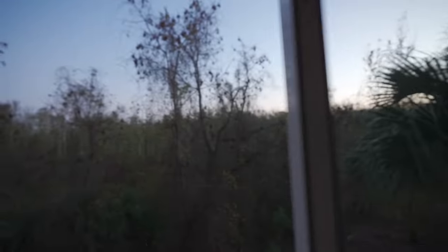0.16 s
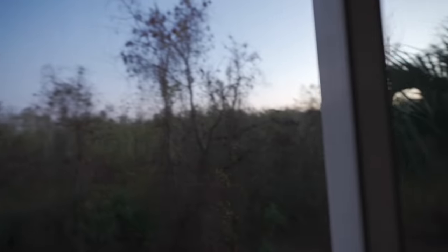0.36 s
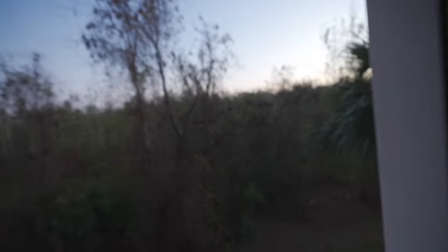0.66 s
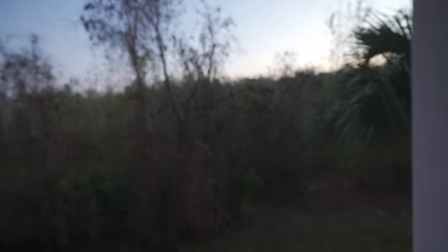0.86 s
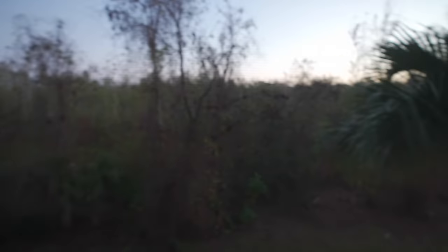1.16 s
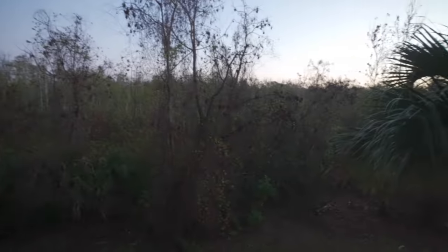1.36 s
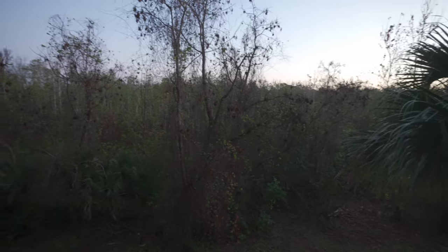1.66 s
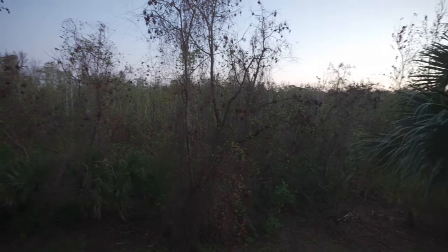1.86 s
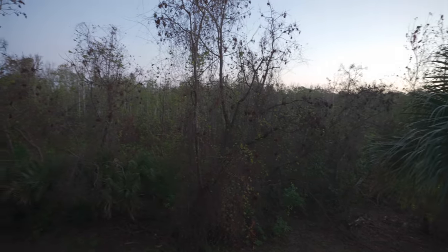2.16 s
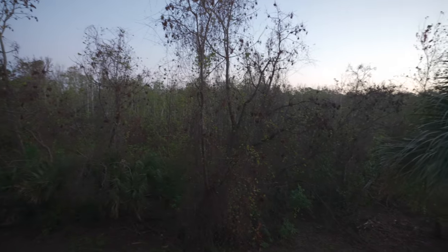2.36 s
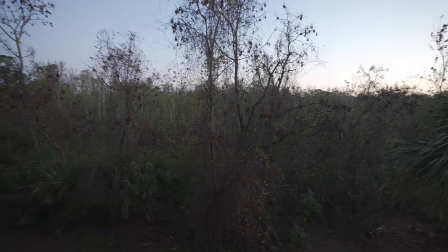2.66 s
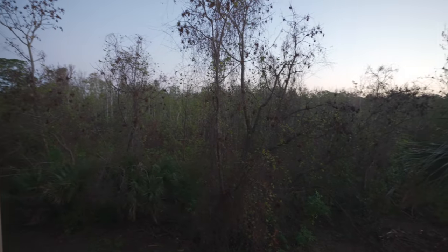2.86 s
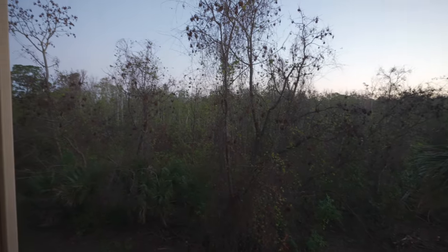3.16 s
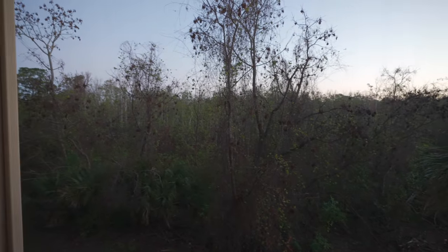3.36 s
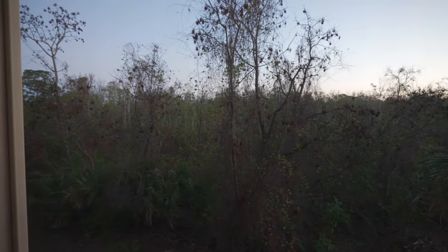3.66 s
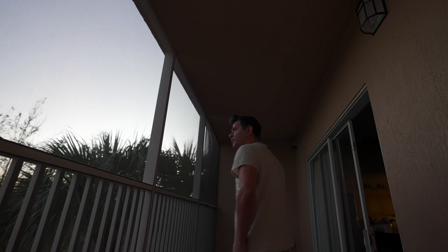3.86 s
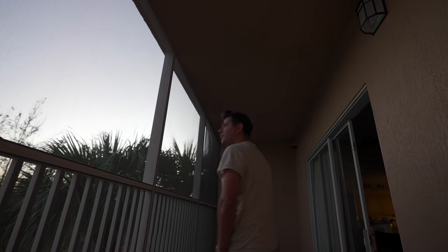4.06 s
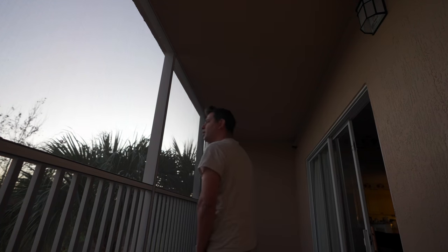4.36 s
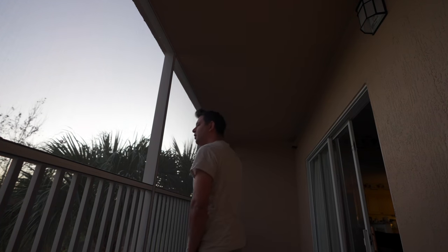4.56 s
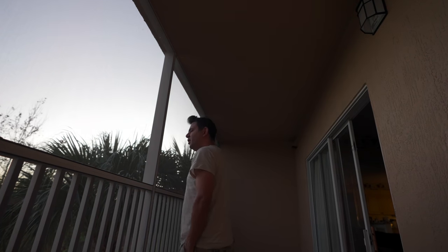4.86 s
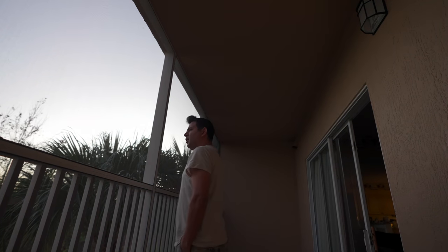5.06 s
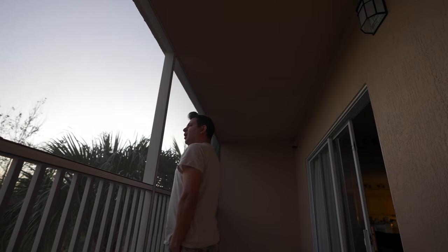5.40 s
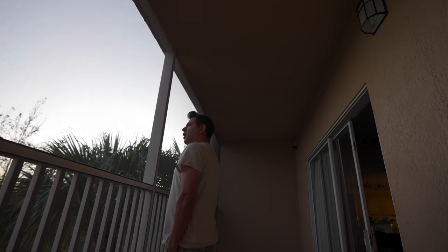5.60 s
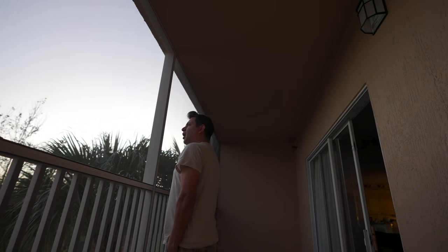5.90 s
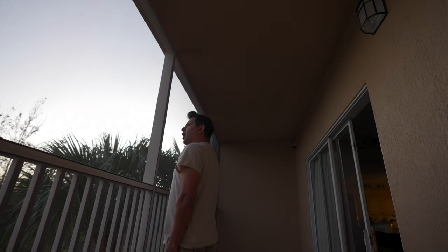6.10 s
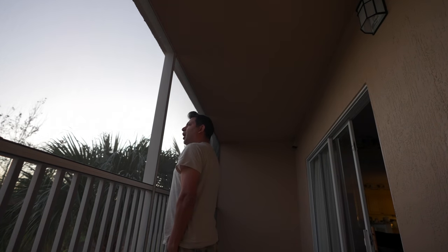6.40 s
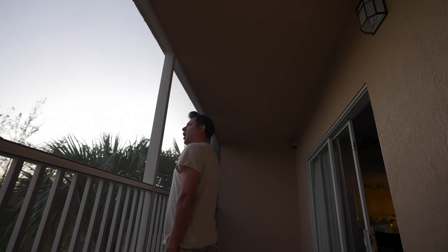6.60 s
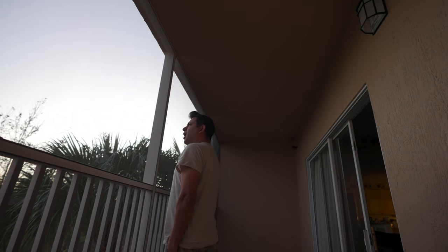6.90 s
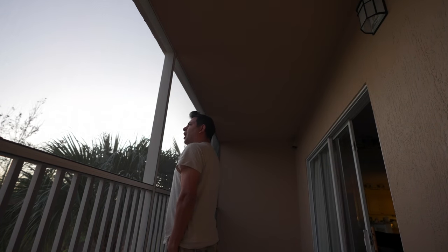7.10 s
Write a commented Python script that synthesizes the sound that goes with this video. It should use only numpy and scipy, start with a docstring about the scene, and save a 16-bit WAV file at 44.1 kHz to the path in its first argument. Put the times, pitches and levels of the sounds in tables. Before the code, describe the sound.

Several songbirds trill, pipe and whistle in scrubby woodland over a low traffic rumble, with microphone thumps and soft shoe scuffs on a balcony.

```python
"""A bird's trill is already under way over rumbling traffic and buffeting air: dawn on a balcony above scrubby woodland.
Songbirds whistle by gliding near-sine tones; filtered decaying noise and a trunk echo spread each song among the trees.
Resonated grains make shoe scuffs; shaped noise makes the traffic and the air on the hand-held microphone;
decaying sines make bumps; smooth noise and steady sines make the electronics hiss and whine."""
import sys
import numpy as np
from scipy import signal
from scipy.fft import rfft, irfft
from scipy.io import wavfile
from scipy.ndimage import uniform_filter1d

SR = 44100
rng = np.random.default_rng(int(sys.argv[2]) if len(sys.argv) > 2 else 0)


def persist_wave(psi):
    """Save psi, clipped to +-1, as 16-bit WAV."""
    counts = np.round(np.clip(psi, -1, 1) * 32767).astype(np.int16)
    wavfile.write(sys.argv[1], SR, np.atleast_2d(counts).T)


N = 319284
T = np.arange(N) / SR
LEAD = SR // 2  # samples of song before the start, whose echo is still ringing
SONG_T = np.arange(-LEAD, N) / SR


def undb(db):
    """Decibel law: amplitude gain of a level."""
    return 10 ** (np.asarray(db) / 20)


def level(x, db):
    """Energy normalisation: scale to an rms level."""
    return x * undb(db) / np.sqrt(np.mean(x ** 2))


def band(x, lo_hz, hi_hz):
    """Band limitation by a steep Butterworth band-pass."""
    return signal.sosfilt(signal.butter(4, [lo_hz, hi_hz], "band", fs=SR, output="sos"), x)


def coloured(points):
    """Spectral shaping: white noise weighted by (f/Hz, level/dB) points joined on a log frequency axis."""
    hz, db = np.transpose(points)
    f = np.maximum(np.arange(N // 2 + 1) * SR / N, 1)
    gain = undb(np.interp(np.log(f), np.log(hz), db, -120, -120))
    return irfft(rfft(rng.standard_normal(N)) * gain, N)


def resonate(x, peaks):
    """Modal superposition: a parallel sum of resonances (f/Hz, width/Hz, level/dB)."""
    out = 0
    for hz, width, db in peaks:
        out = out + undb(db) * signal.lfilter(*signal.iirpeak(hz, hz / width, SR), x)
    return out


def walk(rate, size=N):
    """Random modulation: Gaussian values held 1 / rate s, then smoothed twice."""
    k = int(SR / rate)
    steps = np.repeat(rng.standard_normal(size // k + 1), k)
    return uniform_filter1d(uniform_filter1d(steps, k), k)[:size]


def note(rows, start=0., db=0., multiple=0.99, edge_s=0.0029):
    """Frequency modulation: a near-sine syllable follows rounded glides, with soft ends."""
    # by default a note sounds at 0.99 of its listed pitch
    s, hz, shape_db = np.transpose(rows)
    s, out = np.sort(s) + start, np.zeros(len(SONG_T))
    here = slice(*np.searchsorted(SONG_T, [s[0] - .01, s[-1] + .01]))
    t = SONG_T[here]
    pitch = uniform_filter1d(np.interp(t, s, hz), size=200)
    phase = 2 * np.pi * multiple * np.cumsum(pitch) / SR
    edges = np.clip(np.minimum(t - s[0], s[-1] - t) / edge_s + .5, 0, 1) ** 2
    out[here] = np.sqrt(2) * undb(db + np.interp(t, s, shape_db)) * edges * np.sin(phase)
    return out


def song(phrase, events, wander, scatter_db, high_db=0, opening_db=0):
    """Repetition with variation: each note of the phrase differs a little in pitch and strength."""
    tune, sway = rng.standard_normal((len(events), len(phrase), 2)).T
    sway = scatter_db * sway
    sway[1] += high_db  # the second note of every phrase
    sway[0, 0] += opening_db  # the very first note
    out = 0
    for i, (s, db) in enumerate(events):
        for j, rows in enumerate(phrase):
            out = out + note(rows, s, db + sway[j, i], 1 + wander * tune[j, i])
    return out


# a trilled phrase, a list of notes; columns: t/s from phrase start, f/Hz, relative level/dB
TRILL_NOTES = [
    [(0, 2250, 4), (.009, 2680, -4.5), (.018, 2690, 1), (.03, 2516, -12)],
    [(.068, 3250, -4.5), (.086, 2876, -1), (.098, 3150, -7), (.125, 2880, -5)],
    [(.107, 2533, -6.5), (.118, 2314, -4), (.133, 2155, -8.5), (.15, 2090, -9)],
]
# bouts of trills; columns: start t/s, number of phrases, first spacing/s, slowing/s per phrase,
# level/dB added to the second note, phrase level/dB at start, middle and end
TRILL_BOUTS = [(-.152, 8, .2085, .0016, -1, -40, -40, -41.5), (4.182, 9, .2125, .0008, 4, -42.5, -39, -40)]


def trills():
    """Rhythmic deceleration: the interval between phrases grows linearly within each bout."""
    out = 0
    for start, count, spacing, slowing, high_db, *levels in TRILL_BOUTS:
        k = np.arange(count)
        times = start + spacing * k + slowing * k * (k - 1) / 2
        events = list(zip(times, np.interp(k / k[-1], [0, .5, 1], levels)))
        # a bout swallows its very first note
        out = out + song(TRILL_NOTES, events, 0.0054, scatter_db=2.0, high_db=high_db, opening_db=-22)
    return out


# a falling and rising phrase, a list of notes; columns: t/s from phrase start, f/Hz, relative level/dB
CHEER_NOTES = [
    [(.014, 4673, -11), (.028, 4560, -12.5), (.043, 4250, -5.5), (.058, 3375, -3.5), (.068, 2960, -6)],
    [(.074, 2650, -3), (.09, 2540, -1.5), (.12, 2413, -22), (.165, 2300, -15), (.2, 2914, 0.5)],
    [(.215, 2933, -8), (.232, 3020, 0), (.252, 3515, -1.5)],
]
# its repetitions; columns: t/s, level/dB
CHEER_EVENTS = [(2.88, -48.5), (3.266, -46.5), (3.647, -44), (4.028, -41.5), (4.416, -43.5), (4.8, -41.5)]


def cheers():
    """Wide frequency sweeps: a whistle falls, then rises."""
    return song(CHEER_NOTES, CHEER_EVENTS, 0.0039, scatter_db=3)


# a downward slurred phrase, a list of notes; columns: t/s from phrase start, f/Hz, relative level/dB
SLUR_NOTES = [
    [(0, 4200, -9), (.03, 3900, -9), (.07, 3550, -5)],
    [(.075, 3680, -7), (.12, 3300, -7)],
    [(.13, 3020, 0), (.17, 2700, -3), (.21, 2480, -9)],
]
# its repetitions; columns: t/s, level/dB
SLUR_EVENTS = [(1.02, -58), (1.669, -55), (2.345, -55)]


def slurs():
    """Portamento: each whistle steps down in falling glides; the last starts strongest, then fades."""
    return song(SLUR_NOTES, SLUR_EVENTS, 0.0101, scatter_db=0)


# arched note before the link; columns: t/s from link start, ratio to held f, relative level/dB
ARCH = [(-.088, .86, -15), (-.043, 0.95, -3.5), (0, .9, -8)]
# held note that droops; columns: share of its length, ratio to held f, relative level/dB
HELD = [(0, 0.99, -6), (.55, 1.005, -3.5), (1, .95, -8)]
# faint falling end; columns: t/s from the end of the held note, ratio to held f, relative level/dB
DROP = [(0, 0.84, -11), (.03, .86, -21)]
# piped phrases; columns: held note t/s, length/s, held f/Hz, level/dB,
# link length/s, nominal link start f/Hz (sounds at 0.99 f), level/dB of arch and link
PIPES = [(0.611, 0.069, 3380, -47, 0.042, 2670, -64), (1.255, 0.083, 3355, -45.5, .04, 2700, -64),
         (1.965, 0.08, 3345, -49, .03, 3070, -57), (2.664, 0.082, 3280, -38, 0.034, 2680, -45),
         (3.362, 0.089, 3358, -34.5, 0.027, 3040, -41.5), (4.071, .085, 3366, -40.5, .047, 2710, -43),
         (6.147, 0.093, 3360, -41, 0.041, 2650, -45), (6.834, 0.098, 3430, -39, 0.038, 2720, -47)]


def piping():
    """Pitch proportionality: arch, held note and drop scale with one held pitch; a short link rises between."""
    out = 0
    for s, length, hz, db, link_s, link_hz, lead_db in PIPES:
        link = [(-link_s, link_hz, 0), (0, link_hz + 305, 0)]
        out = out + note(ARCH, s - link_s, lead_db, hz) + note(link, s, lead_db)
        out = out + note(np.multiply(HELD, (length, 1, 1)), s, db, hz) + note(DROP, s + length, db, hz)
    return out


# faint notes sung only once; columns: t/s, length/s, nominal start and end f/Hz (sound at 0.99 f), level/dB
LONE_NOTES = [(0.033, 0.1, 4500, 4400, -63.5), (4.83, 0.12, 1380, 1400, -52),
              (5.79, .035, 3660, 3550, -55.5)]


def lone_notes():
    """Linear glides: single faint whistles."""
    out = 0
    for s, length, hz, to_hz, db in LONE_NOTES:
        out = out + note([(0, hz, 0), (length, to_hz, 0)], s, db)
    return out


# upward swoop opening each syllable; columns: t/s, nominal f/Hz (sounds at 0.99 f), relative level/dB
SWOOP = [(0, 1266, -11), (.017, 1670, -0.5)]
# its two endings, a flip to a high falling note or a sag back; columns as for the swoop
FLIP = [(.017, 2097, -0.5), (0.027, 2047, -1.5), (.032, 1750, -1)]
SAG = [(.017, 1655, 0.5), (.031, 1404, -4)]
# gurgled syllables; columns: t/s, level/dB, ending
GURGLES = [(2.317, -34, SAG), (2.361, -32.5, FLIP), (2.413, -34.5, FLIP), (2.462, -34, FLIP),
           (2.51, -33, SAG), (2.556, -38.5, SAG)]
# nasal first note; columns: t/s, fundamental f/Hz, level/dB
NASAL = [(2.256, 787, -47), (2.266, 1154, -50), (2.288, 1168, -43.5), (2.304, 1044, -44.5),
         (2.318, 1200, -50)]
# its harmonic series; columns: multiple of the fundamental, relative level/dB
NASAL_PARTIALS = [(1, 1.5), (2, 0), (3, -5.5)]


def gurgle():
    """Harmonic superposition colours a deeper voice's nasal note; swooping syllables flip or sag."""
    out = 0
    for s, db, ending in GURGLES:
        out = out + note(SWOOP, s, db) + note(ending, s, db)
    for multiple, db in NASAL_PARTIALS:
        out = out + note(NASAL, db=db, multiple=multiple)
    return out


# reverberation per bird; columns: decay t60/s, diffuse tail level/dB, trunk echo t/s, trunk echo level/dB,
# depth/dB per unit of random flutter in the direct sound
WOODS = {"trill": (.95, 3, .048, -7, 3), "cheer": (.9, -1, .044, -11, 3.5), "slur": (.8, 4, .04, -12, 8),
         "pipe": (1.5, -11, .2, -24, 1.5), "gurgle": (.85, -4.5, .017, -7, 3)}


def woods(x, bird):
    """Reverberation: direct sound, one trunk echo and a diffuse leaf-scattered tail; stirring air flutters them."""
    t60, tail_db, echo_s, echo_db, flutter_db = WOODS[bird]
    t = T[:SR]
    tail = rng.standard_normal(SR) * np.exp(-np.log(1000) * t / t60)
    tail *= np.clip(t / 0.017, 0, 1)  # the diffuse echo builds up over 17 ms
    tail *= undb(tail_db) / np.sqrt(np.sum(tail ** 2))
    tail[int(echo_s * SR)] += undb(echo_db)
    # moving leaves blur the pitch of what they scatter
    fluttering = x * undb(5.6 * walk(260, size=len(x)))
    scattered = signal.fftconvolve(fluttering, tail)[:len(x)]
    direct = x * undb(flutter_db * walk(130, size=len(x)))
    return (direct + scattered)[LEAD:]


def birds():
    """Independent propagation paths: five singers, each with its own balance of direct sound and echo."""
    return (woods(trills(), "trill") + woods(cheers(), "cheer") + woods(slurs(), "slur")
            + woods(piping() + lone_notes(), "pipe") + woods(gurgle(), "gurgle"))


# resonances of sole, grit and dust, applied twice in series; columns: f/Hz, width/Hz, level/dB per pass
SOLE = [(3850, 920, -0.4), (1900, 1530, -0.6)]
GRIT = [(5600, 1800, 5.1), (7830, 390, 4.3)]
DUST = [(10100, 500, -14), (11300, 720, 2), (12800, 2200, 4), (14900, 1900, 5.5)]
# shoe scuffs; columns: t/s, fall/s, sole level/dB, grit level/dB, dust level/dB
SCUFFS = [(.25, 0.17, -50.5, -68, -74), (.345, 0.038, -55, -54, -62), (.79, 0.038, -55, -66, -68),
          (.9, 0.04, -59, -75, -72), (4.099, 0.043, -42.5, -60, -70), (4.17, 0.062, -47.5, -54, -55),
          (5.02, 0.052, -55, -62, -57), (5.11, 0.089, -51.5, -60, -61), (5.43, 0.13, -53, -75, -77),
          (6.011, 0.089, -43.5, -61, -70), (6.539, 0.071, -51.5, -61, -59), (6.61, 0.052, -64, -66, -68),
          (6.73, 0.12, -53.5, -67, -64), (6.83, 0.055, -59, -62, -65), (6.96, 0.11, -58, -63, -60)]


def scuffs():
    """Friction excitation: dense uneven grains ring the sole, the grit and the dust under a sliding shoe."""
    grains = rng.standard_normal(N) * undb(2.54 * rng.exponential(1, N)) * undb(2.7 * walk(120))
    layers = [level(resonate(resonate(grains, peaks), peaks), 0) for peaks in (SOLE, GRIT, DUST)]
    out, rise_s = 0, 0.024
    for s, fall, *levels in SCUFFS:
        rising = -((T - s) / rise_s) ** 2
        falling = -(np.abs(T - s) / fall) ** 1.22
        slide = np.exp(np.where(T < s, rising, falling))
        out = out + slide * sum(undb(db) * x for db, x in zip(levels, layers))
    return out


# air buffeting envelope; columns: t/s, level/dB
BUFFET = [(0, -40), (.17, -27), (.42, -30), (1.45, -34), (1.75, -64)]
# rumbling lurches of the microphone; columns: t/s, half-length/s, level/dB
LURCHES = [(0.354, .1, -32), (1.372, 0.067, -21.5)]
# grip bumps and a heel coming down; columns: t/s, level/dB before the ring's rise and decay, f/Hz
BUMPS = [(.405, -3.5, 77.6), (.63, -6, 41.56), (.914, -8.5, 103.5), (1.286, -4, 85), (1.393, -9, 59),
         (4.264, -11.5, 430), (4.282, -14, 388), (4.303, -10, 450)]


def handling():
    """Low-frequency excitation: air buffets the swinging microphone, it lurches twice and damped bumps ring."""
    s, db = np.transpose(BUFFET)
    out = level(band(rng.standard_normal(N), 31, 65.0), 0) * undb(np.interp(T, s, db, right=-80))
    lurch = sum(undb(db) * np.exp(-((T - s) / half) ** 2) for s, half, db in LURCHES)
    out = out + lurch * level(band(rng.standard_normal(N), 53, 128), 0)
    for s, db, hz in BUMPS:
        t = np.maximum(T - s, 0)
        cycles = t * hz
        rise = np.minimum(cycles / 1.2, 1)
        decay = np.exp(-np.log(1000) * cycles / 6.1)  # down 60 dB after 6.1 cycles
        out = out + undb(db) * rise * decay * np.sin(2 * np.pi * hz * t)
    return out


# relative noise spectrum of distant traffic; columns: f/Hz, level/dB per Hz
TRAFFIC = [(15, -29), (25, -7.5), (43, -23), (63, -6), (81, -2), (138, -9.5), (210, -12), (234, -16.5),
           (266, -15.5), (429, -20), (470, -22), (876, -26.5), (2000, -43), (2600, -111), (4400, -120)]
# tyre roar envelope; columns: t/s, level/dB
ROAR = [(0, -39), (1.05, -38), (1.5, -37), (6.3, -35), (6.65, -32.5), (7.24, -35)]


def traffic():
    """Spectral division: one coloured noise splits into a low engine drone and a slowly swelling tyre roar."""
    far = coloured(TRAFFIC)
    drone = signal.sosfiltfilt(signal.butter(2, 160, fs=SR, output="sos"), far)
    roar_db = np.interp(T, *np.transpose(ROAR)) + 0.88 * walk(3.94)
    return level(drone, -30) * undb(1.57 * walk(6)) + level(far - drone, 0) * undb(roar_db)


# relative noise spectrum of the electronics; columns: f/Hz, level/dB per Hz
HISS = [(1000, -19), (1700, -21), (2160, 0), (2920, 0), (3320, -2), (3930, -16.5), (4950, -11), (6430, -17),
        (6990, -16), (7460, -17), (8410, -21), (9410, -11.5), (12700, -20), (13800, -13), (15700, -18)]
# thin tones of the electronics; columns: f/Hz, mean level/dB
WHINE = [(6757, -77), (7132, -78), (7983, -90), (13513, -83), (13889, -79), (14264, -79), (14637, -84)]


def electronics():
    """Stationary noise and pure tones: smooth hiss with thin whines of steady pitch, levels wavering slightly."""
    hiss = coloured(HISS)
    hiss_db = -65.5 + .6 * walk(3)  # level between 5 and 15.5 kHz
    out = hiss * undb(hiss_db) / np.std(band(hiss, 5000, 15500))
    for hz, db in WHINE:
        out = out + np.sqrt(2) * undb(db + 2.1 * walk(4.01)) * np.sin(2 * np.pi * hz * T)
    return out


def scene():
    """Linear superposition of all sources at the single microphone."""
    return (birds() + scuffs() + handling() + traffic() + electronics())[None]


def record(dry):
    """Band limitation: the microphone drops the deepest bass; the top of the band is cut steeply."""
    dry = signal.sosfilt(signal.butter(2, 34, "high", fs=SR, output="sos"), dry)
    return signal.sosfilt(signal.ellip(12, .3, 70, 15750, fs=SR, output="sos"), dry)


dry = scene()
out = record(dry)
persist_wave(out)
```